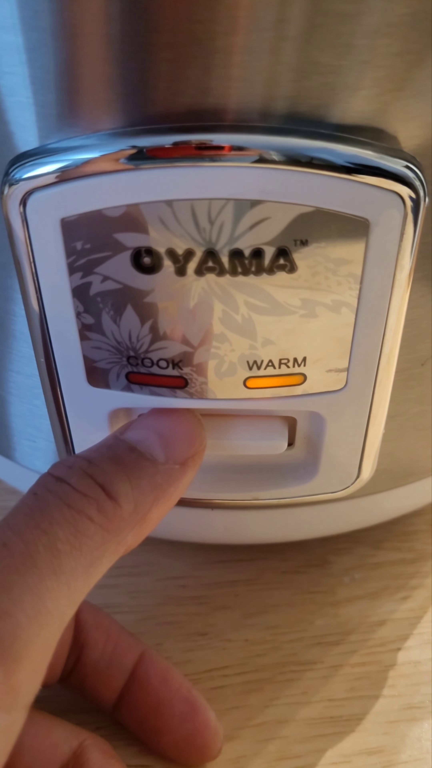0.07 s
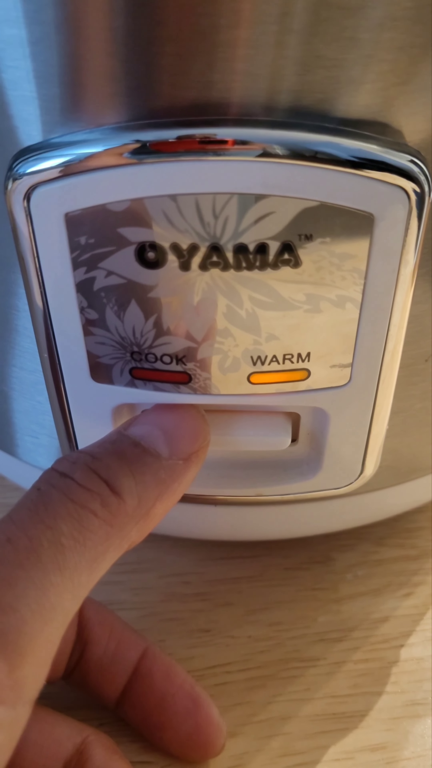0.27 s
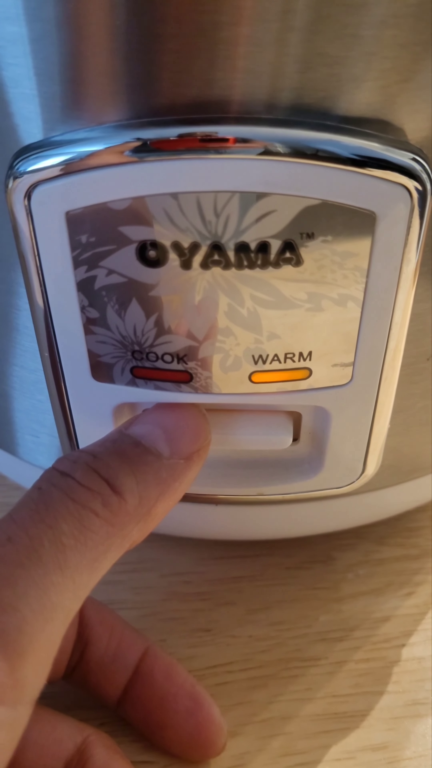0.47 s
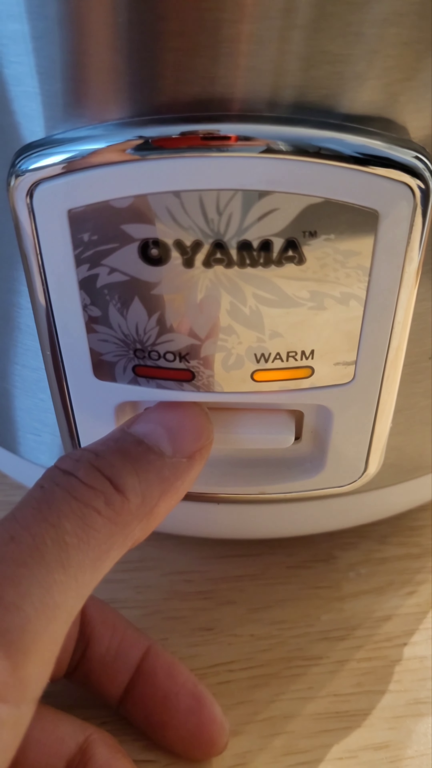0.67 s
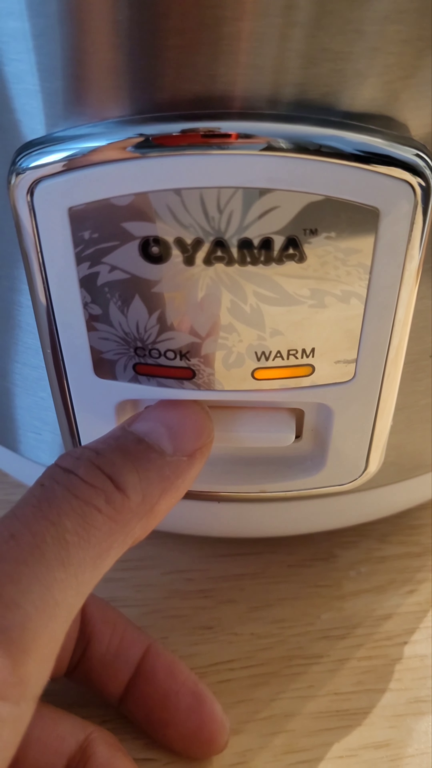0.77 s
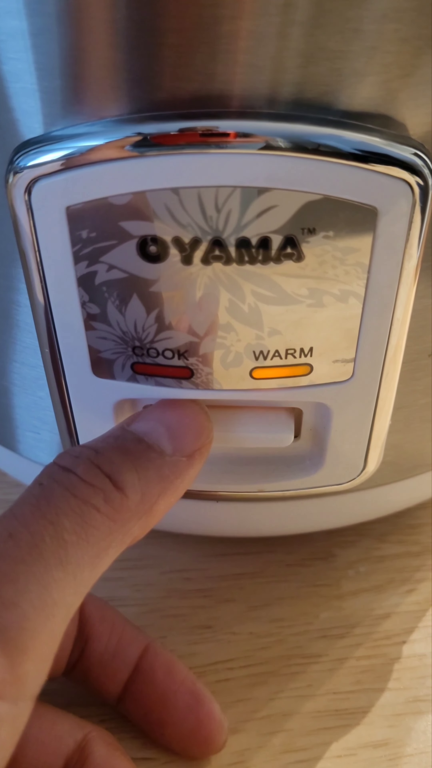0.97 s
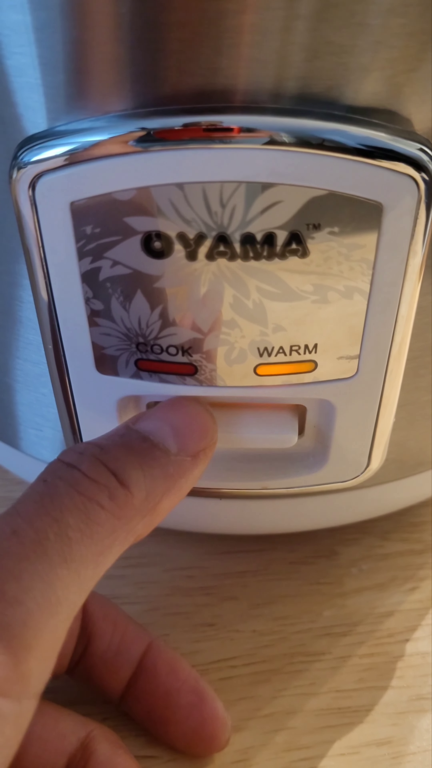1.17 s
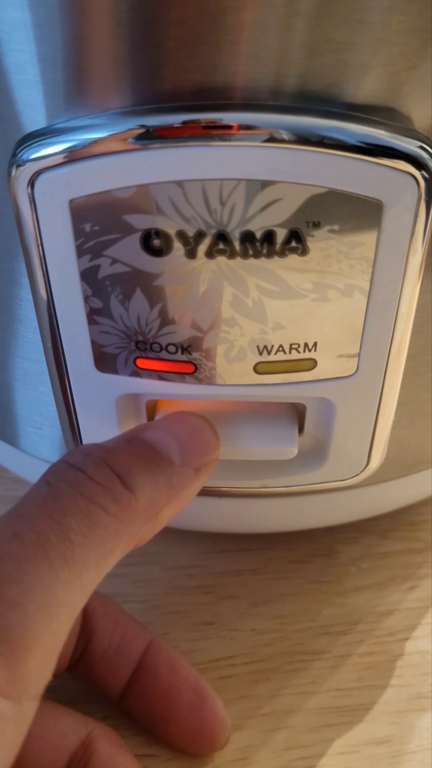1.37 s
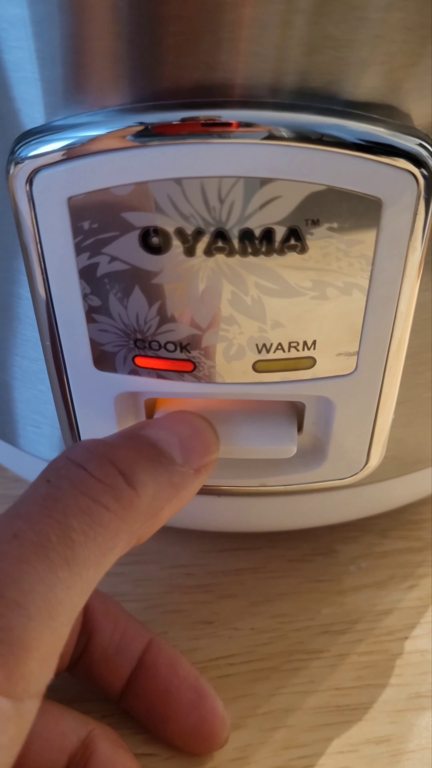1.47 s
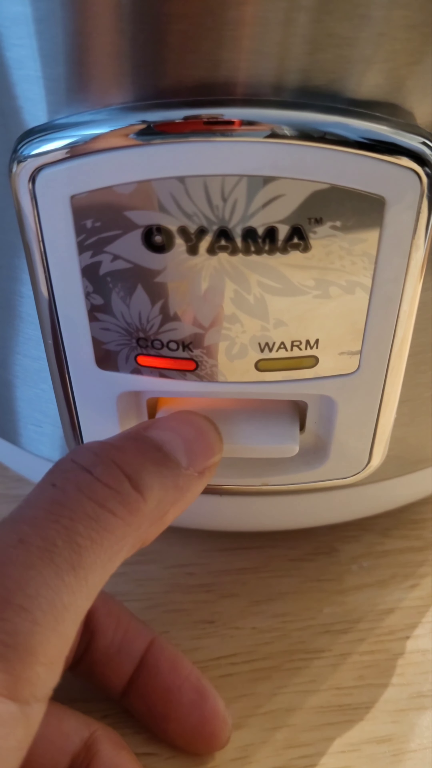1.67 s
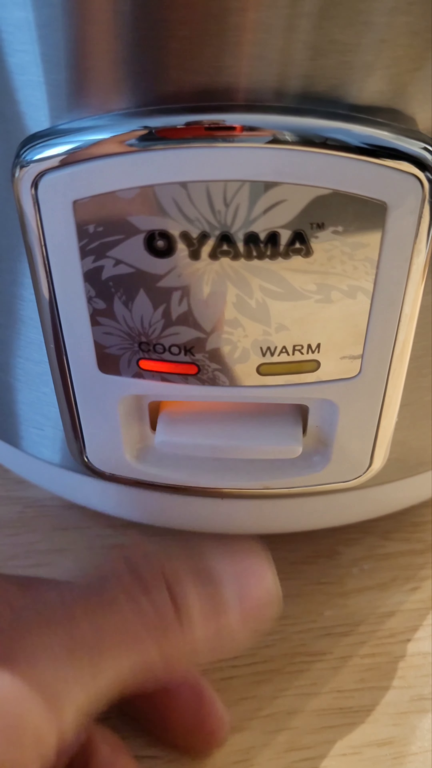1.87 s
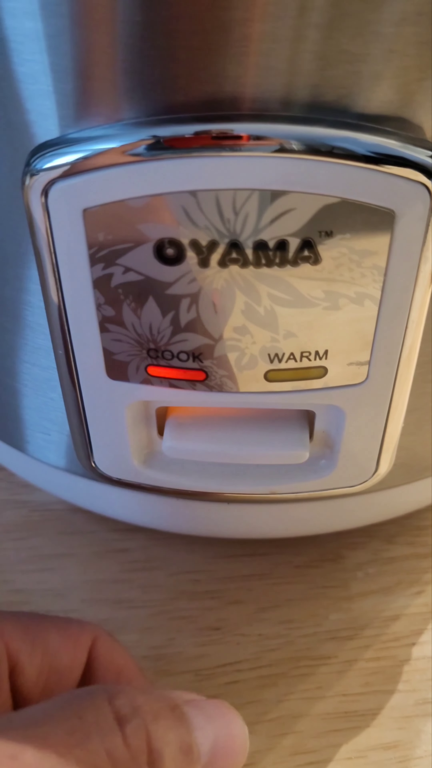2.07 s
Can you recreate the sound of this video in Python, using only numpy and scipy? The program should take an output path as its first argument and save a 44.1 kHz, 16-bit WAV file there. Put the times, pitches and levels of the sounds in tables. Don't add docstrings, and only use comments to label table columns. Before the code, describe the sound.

Close up in a quiet kitchen, a rice cooker lever snaps down with a sharp steel clack ringing its plate and shell; tiny skin ticks follow, then a weaker knock, over faint hum and hiss.

```python
import sys
import numpy as np
from scipy import signal
from scipy.fft import rfft, irfft
from scipy.io import wavfile
from scipy.ndimage import uniform_filter1d

SR = 44100
rng = np.random.default_rng(int(sys.argv[2]) if len(sys.argv) > 2 else 0)


def linear_from_db(decibels):
    return 10 ** (np.asarray(decibels, float) / 20)


def store_pcm(level_fs):
    pcm = np.round(np.clip(level_fs, -1, 1) * 32767).astype(np.int16)
    wavfile.write(sys.argv[1], SR, np.atleast_2d(pcm).T)


N = 94065
PORT_LAG, RING_LAG = 9, 2


def evened(x):
    return x / np.sqrt(np.mean(x ** 2) + 1e-20)


def read(points, hz):
    f, value = np.transpose(points)
    return np.interp(np.log(hz + 1), np.log(f + 1), value)


def level_curve(points):
    return linear_from_db(np.interp(np.arange(N) / SR, *np.transpose(points)))


def add(mix, s, sound):
    part = mix[:, round(s * SR):][:, :sound.shape[-1]]
    part += sound[..., :part.shape[1]]


def sides(db):
    return linear_from_db(np.array([[db / 2], [-db / 2]]))


def pair(size, same):
    a, b = rng.standard_normal((2, size))
    same = np.clip(same, 0, 1)
    return np.array([a, same * a + np.sqrt(1 - same ** 2) * b])


def coloured(x, colour):
    hz = abs(np.fft.fftfreq(4096, 1 / SR))
    log_gain = np.log(linear_from_db(np.maximum(read(colour, hz), -100)))
    taps = np.fft.ifft(np.exp(np.conj(signal.hilbert(log_gain)))).real[:2048]
    return signal.oaconvolve(x, taps[None] / np.linalg.norm(taps), axes=1)[:, :x.shape[1]]


def resonate(x, hz, width):
    turn = np.exp(2j * np.pi * hz * np.arange(x.shape[-1]) / SR)
    r = np.exp(-np.pi * width / SR)
    return 2 * (turn * signal.lfilter([1 - r], [1, -r], x / turn)).real


def rings(modes):
    t = np.arange(SR // 2) / SR
    return sum(linear_from_db(db - 60 * t / t60) * np.sin(2 * np.pi * hz * t) for hz, db, t60 in modes)


def chatter(blows, colour, modes, ring_db, fade_s):
    out, t, ring = np.zeros((2, 2, N)), np.arange(SR // 2) / SR, rings(modes)
    for s, length, db, pan_db in blows:
        shape = np.minimum(t / 0.0014, 1) * linear_from_db(-60 * np.maximum(t - length, 0) / fade_s)
        grit = linear_from_db(3.87 * rng.standard_normal(len(t))).clip(0, 3)
        rattle = pair(len(t), 0.6) * grit * shape
        add(out[0], s, linear_from_db(db) * sides(pan_db) * coloured(rattle, colour))
        add(out[1], s, linear_from_db(db + ring_db) * sides(pan_db) * ring * np.minimum(t / 0.00027, 1))
    return out


def ports(x, lag):
    treble = 0.29
    left = signal.lfilter([1 + treble, -treble], 1, np.roll(x[0], lag))
    return np.array([left, x[1]])


# start_s, chatter_s, level_db, left_right_db
SLAM_BLOWS = [
    (1.3272, 0.0042, -28, 0),
    (1.3305, 0.0016, -26, 0.016),
    (1.3332, 0.00085, -27.5, 0.029),
    (1.3375, 0.0024, -36, 0),
    (1.3418, 0.0025, -41, 0),
    (1.369, 0.0017, -44.5, 0),
    (1.386, .006, -44, 0),
]
# pitch_hz, level_db (per Hz)
SLAM_COLOUR = [(500, -20.5), (1350, -15), (1680, 0), (3300, -7), (5000, -8), (9000, -11), (15500, -19),
               (17000, -44)]
# pitch_hz, level_db, t60_s
PLATE_MODES = [(1681, -8.5, 0.075), (1784, -5, 0.047), (1962, -16.5, .05), (2076, -16.5, .15),
               (2086, -7.5, 0.25), (2373, -11, 0.15), (2458, -8.5, 0.17), (2780, -2.5, 0.12),
               (2872, -13.5, .1), (4090, -4.5, 0.076), (4220, -4.5, 0.071), (6550, -6, 0.09),
               (6760, 2, 0.032), (7070, -0.5, 0.052)]


def slam():
    return chatter(SLAM_BLOWS, SLAM_COLOUR, PLATE_MODES, ring_db=-4.0, fade_s=0.021)


# pitch_hz, level_db, t60_s, left_right_db
SHELL_MODES = [(111.7, -50, .1, -3.5), (163.4, -27, 0.24, 8), (264, -28.5, 0.1, -1),
               (332.6, -6.5, 0.0593, 9.5), (365, -12.5, 0.073, 2.5), (392.2, -11, 0.16, -11),
               (505, -20.5, .06, -1), (563, -12, 0.099, -5.5), (693, -27.5, .06, 0), (796, -5, 0.12, -0.5),
               (844.7, -1.5, 0.11, -10), (836, -26, .25, -2.5), (1133, -25, 0.076, 1)]
# start_s, level_db, push_s, treble_tilt_db (per octave from 850 Hz)
THUMPS = [
    (1.312, -42.5, 0.00098, -1.5),
    (1.3300, -26, 0.0015, -2),
    (1.333, -19.5, 0.00066, 20),
    (1.341, -31, 0.0011, -2),
    (1.386, -43, .0012, -3),
    (1.419, -46.5, .002, -4),
    (1.9351, -41.5, 0.00088, 5),
    (1.9459, -37, 0.0011, 15.5),
]


def shell():
    out, t = np.zeros((2, N)), np.arange(SR // 2) / SR
    for s, db, push_s, tilt_db in THUMPS:
        ring = np.zeros((2, SR // 2))
        for hz, mode_db, t60, pan_db in SHELL_MODES:
            ring += sides(pan_db) * linear_from_db(tilt_db * np.log2(hz / 850)) * rings([(hz, mode_db, t60)])
        push = np.sin(np.pi * np.clip(t[:SR // 100] / push_s, 0, 1)) ** 2
        add(out, s, linear_from_db(db) * signal.oaconvolve(ring, push[None] / push.sum(), axes=1))
    return out


# start_s, chatter_s, level_db, left_right_db
LATCH_BLOWS = [
    (1.3068, 0.0034, -40.5, 0),
    (1.3115, 0.0047, -40.5, 6.5),
    (1.317, 0.004, -41, 3.5),
]
# pitch_hz, level_db (per Hz)
LATCH_COLOUR = [(300, -14.5), (2400, -7), (2950, -21.5), (3500, -8.5), (7500, -6), (8600, -33.5),
                (15500, -33), (17000, -54.5)]
# pitch_hz, level_db, t60_s
SPRING_MODES = [(4030, -9, 0.067), (5150, -3, 0.032), (5700, -10, .02), (6820, -1.5, 0.04),
                (7440, -0.5, .025), (9600, -10.5, 0.0093)]


def latch():
    return chatter(LATCH_BLOWS, LATCH_COLOUR, SPRING_MODES, ring_db=2, fade_s=0.012)


# start_s, chatter_s, level_db, left_right_db
KNOCK_BLOWS = [
    (1.931, 0.0028, -69.5, 27),
    (1.9348, 0.0075, -48, 6),
    (1.941, 0.0027, -43, -0.5),
    (1.9465, 0.0052, -47.5, -2.5),
]
# pitch_hz, level_db (per Hz)
KNOCK_COLOUR = [(500, -6.5), (1100, -0.5), (2100, -6.5), (4800, -4), (8400, -11.5), (10000, -20),
                (12200, -21), (15500, -24.5)]
# pitch_hz, level_db, t60_s
LEVER_MODES = [(3830, 1, 0.044), (4720, -1, 0.033), (7240, -1, 0.018), (9320, 2.5, 0.0092)]


def knock():
    return chatter(KNOCK_BLOWS, KNOCK_COLOUR, LEVER_MODES, ring_db=0, fade_s=0.018)


# start_s, end_s, start_db, end_db
CREAKS = [
    (1.124, 1.215, -78.5, -82.5),
    (1.263, 1.309, -96.5, -52.5),
    (1.89, 1.917, -71, -75),
    (1.918, 1.931, -77, -50.5),
]
# pitch_hz, width_hz, level_db
HINGE_MODES = [(800, 870, 1), (1280, 180, 0.5), (1770, 230, 6.5), (2390, 640, -10.5)]


def hinge():
    t, level, slips_per_s = np.arange(N) / SR, np.zeros(N), 3000
    for start, end, start_db, end_db in CREAKS:
        level += ((t > start) & (t < end)) * linear_from_db(np.interp(t, [start, end], [start_db, end_db]))
    slips = (rng.random(N) < slips_per_s / SR) * rng.standard_normal(N) + .08 * pair(N, .5)
    creak = sum(linear_from_db(db) * resonate(resonate(slips, hz, w), hz, 1.6 * w) for hz, w, db in HINGE_MODES)
    return sides(9) * evened(creak) * uniform_filter1d(level, size=250)


# start_s, chatter_s, level_db, left_right_db
NAIL_BLOWS = [
    (1.9347, 0.0054, -55, 9),
    (1.941, 0.0031, -57.5, -4.5),
]
# pitch_hz, level_db (per Hz)
NAIL_COLOUR = [(8000, -49), (12500, -28), (13500, 3.5), (15500, -4), (16800, -41)]


def nail():
    return chatter(NAIL_BLOWS, NAIL_COLOUR, [(14000, 0.0019, 0.012)], ring_db=-10, fade_s=0.026)


# start_s, level_db, t60_s
TICKS = [
    (1.3082, -46, 0.04),
    (1.497, -70, 0.02),
    (1.5968, -56.5, 0.011),
    (1.6, -77.5, 0.44),
    (1.769, -62, 0.0075),
    (1.772, -79.5, 0.28),
]
# start_s, end_s
RUB = (1.69, 1.825)
# pitch_hz, level_db
SKIN_COLOUR = [(4000, -36.5), (7000, -5), (9500, -6), (10800, -12), (12500, 3.5), (14000, -7.5),
               (15500, -3), (16000, -23.5)]


def skin():
    t = np.arange(N) / SR
    stroke = np.clip((t - RUB[0]) / (RUB[1] - RUB[0]), 0, 1)
    level = linear_from_db(-86) * np.sin(np.pi * stroke ** 1.444) ** .5
    for s, db, t60 in TICKS:
        level += (t > s) * linear_from_db(db - 60 * abs(t - s) / t60)
    return sides(7) * coloured(pair(N, .5) * level, SKIN_COLOUR)


# centre_s, pitch_hz, rise_s, fall_s, level_db
THUDS = [
    (1.557, 232, .012, .02, -57),
    (1.9175, 250, .003, .002, -44),
    (1.9240, 280, .0045, .0015, -35),
    (1.9437, 290, .002, .0035, -33),
]


def thuds():
    out = np.zeros((2, N))
    for s, hz, rise, fall, db in THUDS:
        u = np.arange(N) / SR - s
        bump = np.exp(-(u / np.where(u < 0, rise, fall)) ** 2)
        out += linear_from_db(db) * bump * np.cos(2 * np.pi * hz * u)
    return out


# start_s, pitch_hz, level_db, t60_s
PINGS = [
    (1.92, 4120, -64, 0.04),
    (1.942, 1934, -50.5, 0.096),
    (1.942, 2386, -46.5, 0.054),
    (1.942, 5200, -50, 0.045),
    (1.967, 4100, -58, .03),
    (1.991, 3790, -56, 0.036),
    (2.001, 1460, -60, 0.032),
    (2.031, 1520, -58, 0.047),
]


def pings():
    out, onset = np.zeros((2, N)), np.minimum(np.arange(SR // 2) / SR / .001, 1)
    for s, hz, db, t60 in PINGS:
        add(out, s, rings([(hz, db, t60)]) * onset * np.ones((2, 1)))
    return out


# pitch_hz, t60_s
KITCHEN_DECAY = [(200, 0.27), (800, 0.39), (2000, 0.36), (5000, 0.37), (10000, 0.34), (13000, 0.29),
                 (16000, 0.38)]
# pitch_hz, level_db
KITCHEN_LEVEL = [(200, -3), (450, -1.5), (800, -11), (1300, -7.5), (2200, -6), (5000, -7.5), (10000, -8.5),
                 (16000, -4.5)]


def kitchen(x):
    taps = np.zeros((2, SR // 2))
    slots = np.arange(200, SR // 2 - 20, 12)
    at = slots + rng.integers(0, 12, (2, len(slots)))
    np.put_along_axis(taps, at, rng.choice([-1., 1.], at.shape), 1)
    hz, t, z = signal.stft(taps, SR, nperseg=256)
    decay = linear_from_db(-60 * t / read(KITCHEN_DECAY, hz)[:, None])
    tail = signal.istft(z * decay, SR, nperseg=256)[1]
    wet = rfft(signal.fftconvolve(x, tail / np.linalg.norm(tail[0]), axes=1)[:, :N])
    hz = np.fft.rfftfreq(N, 1 / SR)
    apart = hz ** 2 / (hz ** 2 + 500 ** 2)
    wet = apart * wet + (1 - apart) * wet.sum(0) / np.sqrt(2)
    return irfft(wet * linear_from_db(read(KITCHEN_LEVEL, hz)) * (hz < 15850), N)


# time_s, level_db
HUM_SWELL = [(0, -64.5), (.36, -66.5), (.44, -91), (.63, -56.5), (.78, -69), (1.0, -70), (1.15, -58.5),
             (1.45, -59), (1.5, -70), (1.6, -62.5), (1.8, -52.5), (1.9, -78), (2.13, -95)]
# pitch_hz, width_hz, level_db
HUM_MODES = [(115.3, 1.1, -12), (164.1, 9.1, -1.5), (228, 36, -1), (318, 46, -0.5)]
# time_s, level_db
RUMBLE_SWELL = [(0, -79), (.5, -70.5), (.62, -58.5), (.72, -64.5), (1.05, -70.5), (1.2, -60.5),
                (1.45, -76.5), (1.65, -94), (1.79, -53), (1.88, -73), (1.97, -61.5), (2.13, -78)]


def fridge():
    t, noise = np.arange(N) / SR, pair(N, 0.85)
    line = level_curve(HUM_SWELL) * np.sqrt(2) * np.sin(2 * np.pi * HUM_MODES[0][0] * t)
    fuzz = sum(linear_from_db(db) * evened(resonate(resonate(noise, hz, w), hz, w)) for hz, w, db in HUM_MODES)
    rumble = evened(resonate(resonate(noise, 61, 57), 61, 57))
    return line + linear_from_db(-68.5) * fuzz + rumble * level_curve(RUMBLE_SWELL)


# pitch_hz, likeness (-1 to 1)
PORT_SAME = [(60, 0.94), (180, 0.9), (550, 0.42), (1650, -0.35), (4970, 0.42), (15000, -1)]


def wash(colour, db, patchy_db):
    frames, hz = N // 512 + 5, np.fft.rfftfreq(2048, 1 / SR)
    a, b, c, d, patches = rng.standard_normal((frames, 1025, 5)).T
    patches = evened(uniform_filter1d(uniform_filter1d(patches, size=5, axis=0), size=8, axis=1))
    same, left = np.clip(read(PORT_SAME, hz), -1, 1)[:, None], a + 1j * b
    z = np.array([left, same * left + np.sqrt(1 - same ** 2) * (c + 1j * d)])
    f = np.transpose(colour)[0]
    inside = (hz >= f[0]) & (hz <= f[-1])
    z *= linear_from_db(read(colour, hz)[:, None] + patchy_db * patches) * inside[:, None]
    return linear_from_db(db) * evened(signal.istft(z, nperseg=2048, noverlap=1536)[1][:, :N])


# pitch_hz, level_db (per Hz)
AIR_COLOUR = [(20, -22.5), (50, -10.5), (130, -5), (330, -10), (520, -12), (1080, -18.5), (1300, -39),
              (2000, -47)]
# time_s, level_db
STIR = [(0, -2.5), (.5, -3), (.7, 1), (1.1, 0.5), (1.27, 6), (1.5, 3.5), (1.7, 1.5), (1.9, 3.5),
        (2.13, -2.5)]


def air():
    return sides(-0.54) * wash(AIR_COLOUR, -64, 2.5) * level_curve(STIR)


# pitch_hz, level_db (per Hz)
MIC_HISS = [(900, -6), (1500, 3.5), (3200, -4.5), (8300, -6.5), (15750, -2.5), (15950, -29.5)]
# pitch_hz, level_db (per Hz)
WHISTLE = [(3500, -19), (4400, -15.5), (4900, -5), (7600, -4), (8300, -30.5)]


def microphone_noise():
    hiss = sides(-0.69) * wash(MIC_HISS, -83.7, .6)
    return hiss + linear_from_db([[0], [-17]]) * wash(WHISTLE, -73.5, 0.48)


def scene():
    rattle, ring = slam() + latch() + knock()
    rattle = ports(rattle, PORT_LAG) + hinge()
    ring, body = ports(ring, RING_LAG), shell()
    near = ports(nail().sum(0), PORT_LAG) + skin() + thuds() + pings()
    room = kitchen(rattle + linear_from_db(-6) * ring + linear_from_db(-1) * body + linear_from_db(-4.5) * near)
    cooker = rattle + ring + body + near + room
    cooker = signal.sosfilt(signal.butter(2, 76, "high", fs=SR, output="sos"), cooker)
    return cooker + fridge() + air() + microphone_noise()


def top_cut(x):
    return signal.sosfilt(signal.butter(12, 16820, fs=SR, output="sos"), x)


def record(dry):
    cut = signal.sosfilt(signal.butter(2, 54.6, "high", fs=SR, output="sos"), dry)
    cut = signal.sosfiltfilt(signal.butter(12, 16600, fs=SR, output="sos"), cut)
    return top_cut(cut)


dry = scene()
out = record(dry)
store_pcm(out)
```